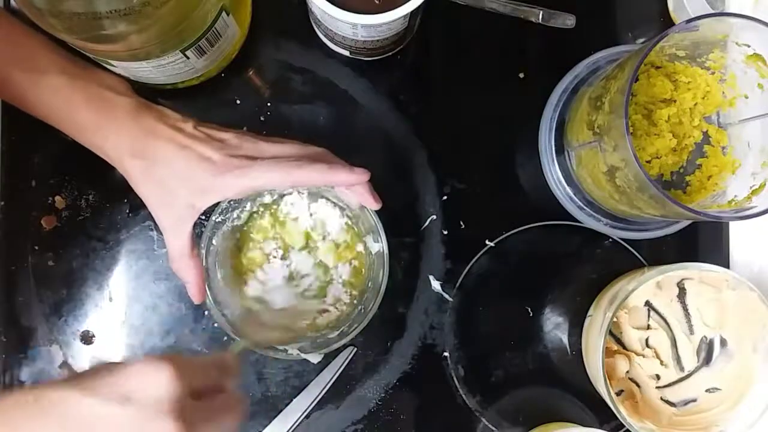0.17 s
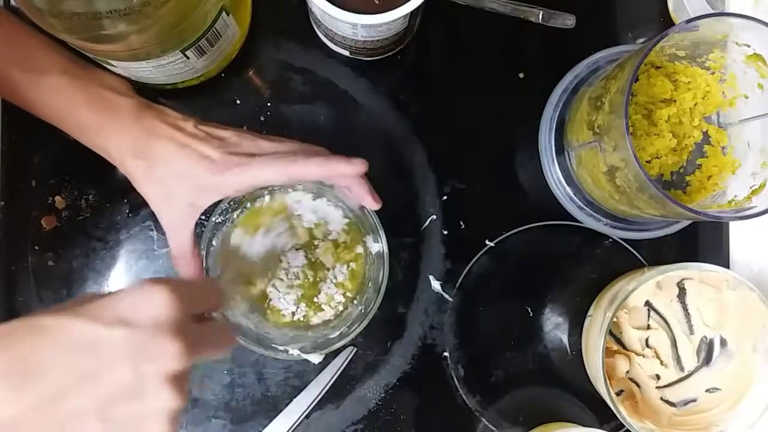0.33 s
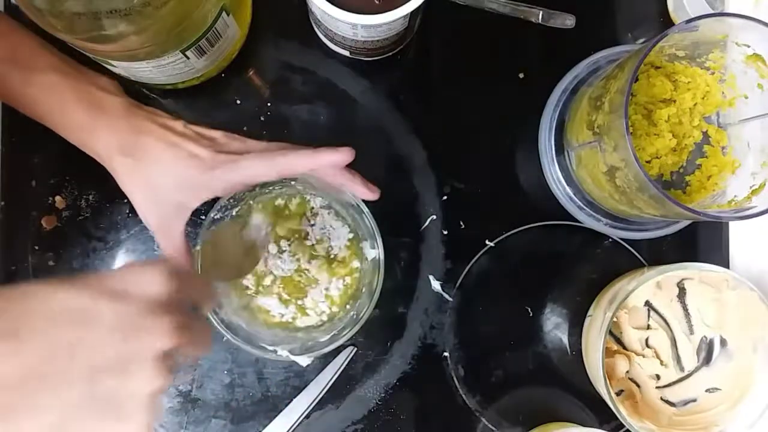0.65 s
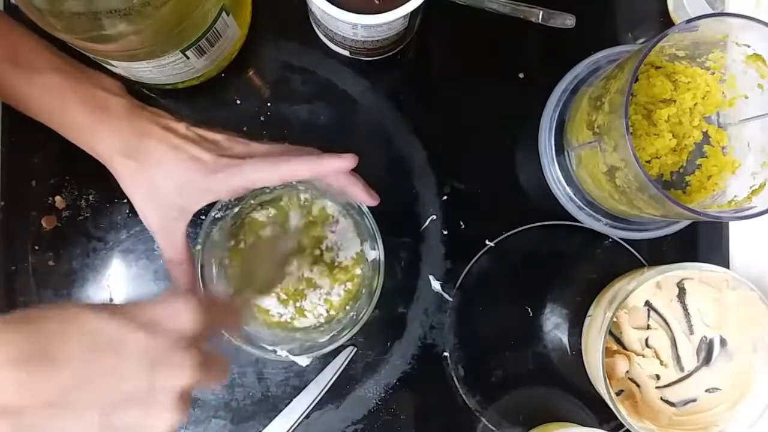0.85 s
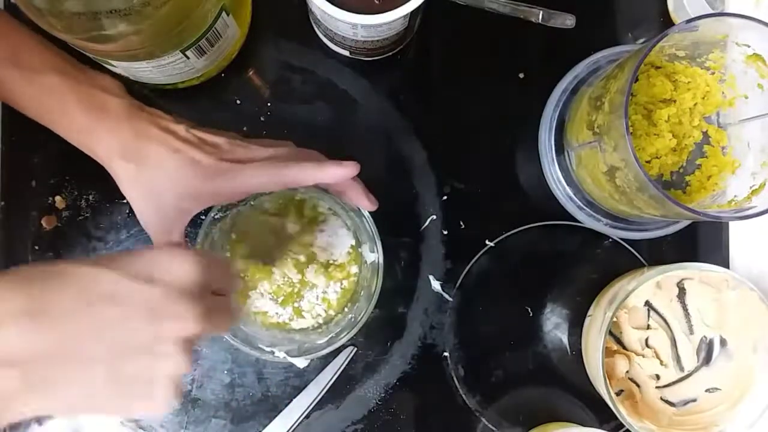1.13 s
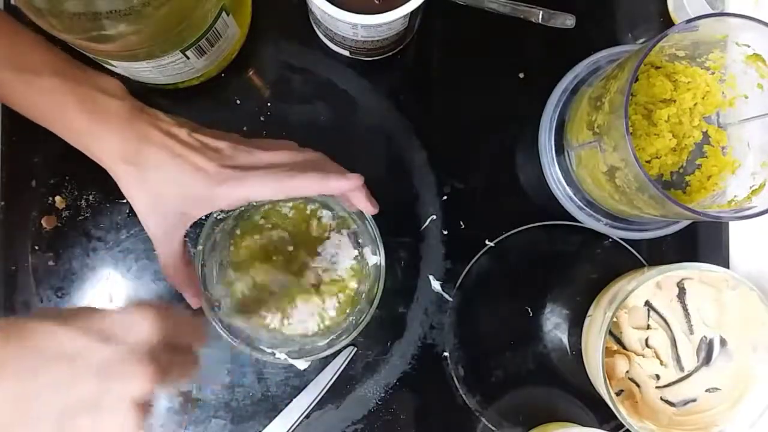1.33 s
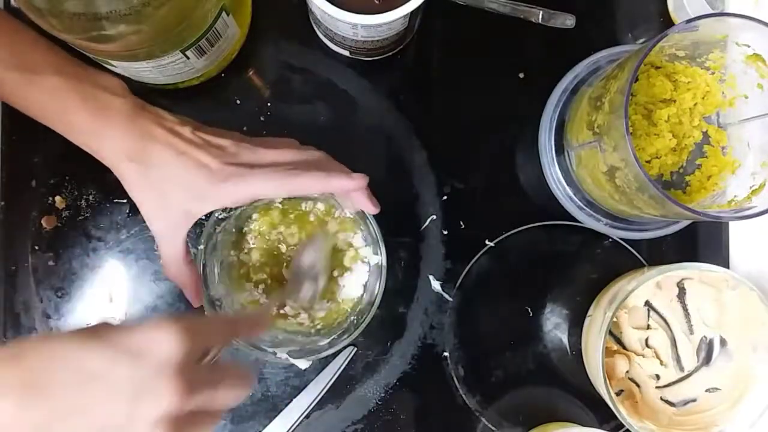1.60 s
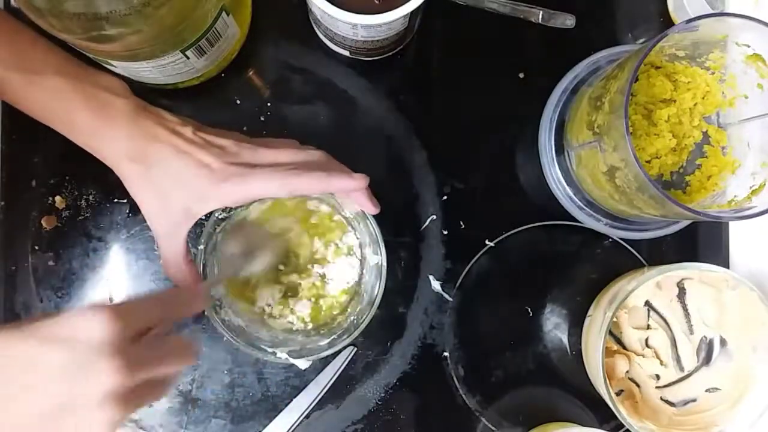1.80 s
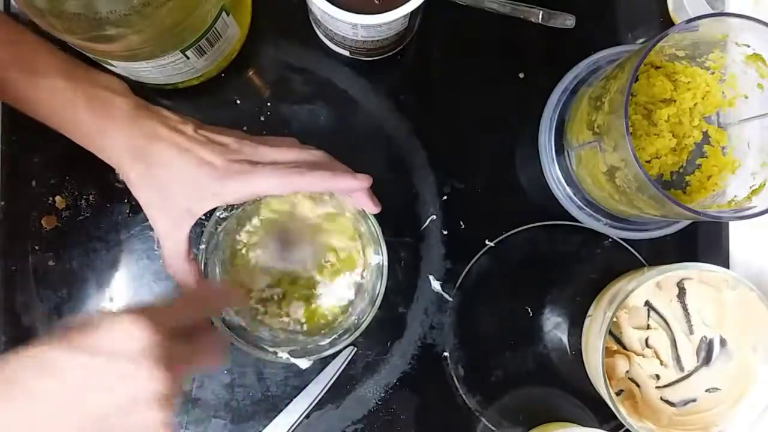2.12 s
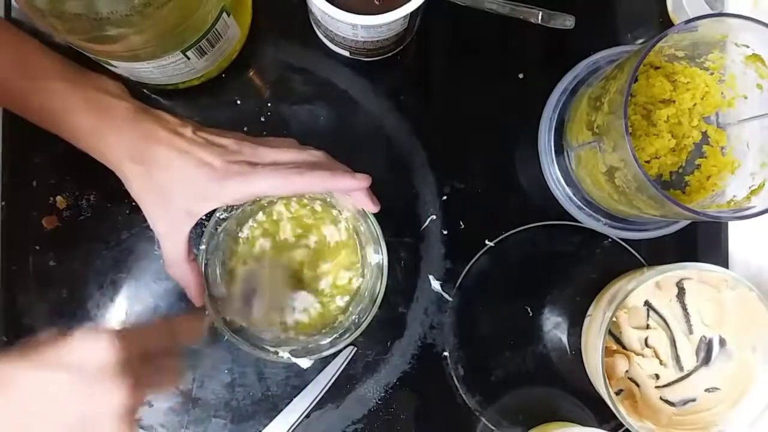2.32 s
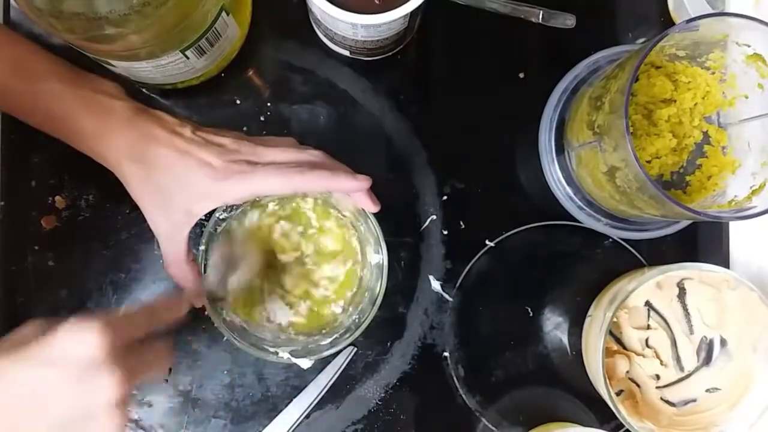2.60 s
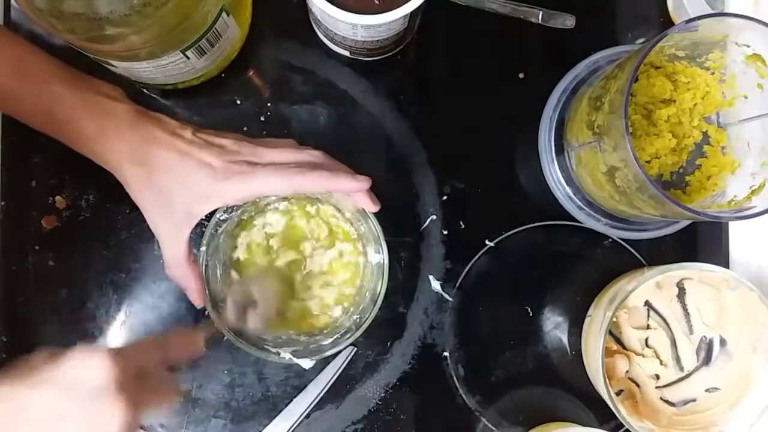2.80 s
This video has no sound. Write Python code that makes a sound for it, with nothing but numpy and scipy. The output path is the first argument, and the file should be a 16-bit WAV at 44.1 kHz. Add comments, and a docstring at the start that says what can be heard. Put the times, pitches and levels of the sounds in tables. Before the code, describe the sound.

Spoon stirring sticky paste in a glass bowl, with irregular clinks, dull knocks and soft scrapes.

```python
"""On a kitchen counter, a metal spoon stirs thick sugary paste in a small glass bowl held by one hand.
Impact on bare glass excites the bowl's modes in a clink, and the bowl thumps the counter; cushioned by
paste, the spoon only knocks dully. The sugar grinds softly, crackles as it tears off the spoon and
scrapes along the wall. A small room reverberates and an appliance hums; the sound is close and mono."""
import sys
import numpy as np
from scipy import signal
from scipy.fft import rfft, irfft, next_fast_len
from scipy.io import wavfile
from scipy.ndimage import uniform_filter1d, map_coordinates

SR = 44100
rng = np.random.default_rng(int(sys.argv[2]) if len(sys.argv) > 2 else 0)


def master(y):
    """Save y as 16-bit WAV."""
    cut = np.clip(np.atleast_2d(y).T, -1, 1)
    pcm = np.round(cut * 32767)  # scale
    wavfile.write(sys.argv[1], SR, pcm.astype(np.int16))


N = 130095

# friction spectrum of wet sugar (frequency [Hz], relative level [dB])
SUGAR_SPECTRUM = [(300, -13.5), (900, -0.5), (1700, 3), (2600, -6.5), (4500, -6.5), (7000, -14),
                  (9000, -12.5), (11000, -22), (15000, -20.5)]


def amp(db):
    """Decibels to amplitude ratio."""
    return 10 ** (np.asarray(db) / 20)


def along(points, hz):
    """Interpolation of (frequency, value) points on a logarithmic frequency axis."""
    f, v = np.transpose(points)
    return np.interp(np.log(hz + 1), np.log(f + 1), v)


def resonance(hz, centre_hz, half_width_oct):
    """A Lorentzian peak of height 1 in log frequency."""
    return 1 / (1 + (np.log2((hz + 1) / centre_hz) / half_width_oct) ** 2)


def wobble(rate):
    """Slow random modulation: a spline through `rate` knots a second."""
    knots = rng.standard_normal(int(N * rate / SR) + 4)
    return map_coordinates(knots, [np.arange(N) * rate / SR])


def coloured(x, spectrum):
    """Spectral shaping of x by a dB function of frequency, scaled to rms 1."""
    size = next_fast_len(len(x))
    gain = amp(spectrum(np.fft.rfftfreq(size, 1 / SR)))
    shaped = irfft(rfft(x, size) * gain, size)[:len(x)]
    return shaped / np.sqrt(np.mean(shaped ** 2) + 1e-20)


def burst(t, spectrum, t60_s, rise_s=1e-4):
    """Modal overlap: dense, heavily damped vibrations merge into exponentially decaying noise."""
    envelope = amp(-60 * t / t60_s) * (1 - np.exp(-t / rise_s))
    magnitude = amp(spectrum(np.fft.rfftfreq(len(t), 1 / SR)))
    x = coloured(rng.standard_normal(len(t)), spectrum) * envelope
    for _ in range(3):  # impose spectrum and envelope in turn to even out random peaks
        x = irfft(magnitude * np.exp(1j * np.angle(rfft(x))), len(t))
        x = envelope * x / np.sqrt(np.abs(uniform_filter1d(x * x, size=300)) + 1e-20)
    return x


def add(track, start_s, x):
    """Superposition of x on the track."""
    part = track[max(round(start_s * SR), 0):][:len(x)]
    part += x[:len(part)]


def kitchen(x, direct_db=0):
    """Reverberation: direct sound, early reflections from counter and jars, and a short diffuse tail."""
    # reverberation time of the room (frequency [Hz], T60 [s])
    decay_times = [(100, 0.78), (400, 0.59), (1500, 0.3), (4000, 0.35), (8000, 0.28)]
    tail_db, tail_rise_s, early_db, echoes = -10, 0.0069, -7.5, 12
    hz, t, noise = signal.stft(rng.standard_normal(SR // 2), SR, nperseg=256)
    tail = signal.istft(noise * amp(-60 * t / along(decay_times, hz)[:, None]), SR, nperseg=256)[1]
    tail *= 1 - np.exp(-np.arange(len(tail)) / SR / tail_rise_s)
    response = amp(tail_db) * tail / np.linalg.norm(tail)
    delays_s = .003 + .016 * rng.random(echoes)
    response[(delays_s * SR).astype(int)] += amp(early_db) * rng.choice([-1, 1], echoes) / np.sqrt(echoes)
    response[0] += amp(direct_db)
    return signal.fftconvolve(x, response)[:len(x)]


def appliance():
    """Tones over broadband noise: a hum, slightly modulated in level and phase, in steady room air."""
    # partials of the hum (frequency [Hz], level [dB])
    partials = [(119, -67), (199, -55), (392, -65), (473, -62.5)]
    # spectrum of the room air (frequency [Hz], relative level [dB])
    air_spectrum = [(25, -30.5), (58, -16), (160, -10.5), (300, -13), (430, -18.5), (600, -18), (1100, -32),
                    (1550, -36), (2100, -55), (4000, -52.5), (5400, -47), (9200, -44.5), (10200, -57),
                    (16000, -60)]
    waver_db, air_db = 2.5, -54
    t = np.arange(N) / SR
    hum = sum(amp(db + waver_db * wobble(9.7)) * np.sin(2 * np.pi * hz * t + 0.48 * wobble(7.1))
              for hz, db in partials)
    return hum + amp(air_db) * coloured(rng.standard_normal(N), lambda hz: along(air_spectrum, hz))


def grinding():
    """Shot noise: wet sugar grains crushed under the moving spoon each give a random impulse."""
    # envelope of the stirring (time [s], relative level [dB])
    stirring = [(0, -49), (0.182, -66.5), (0.503, -77.5), (0.852, -78.5), (1.151, -76), (1.451, -70.5),
                (1.62, -70), (1.781, -63.5), (2.05, -66.5), (2.2, -63), (2.401, -55.5), (2.8, -54.5),
                (2.95, -59.5)]
    grains_per_s, spread_db, gain_db, waver_db = 1800, 5, -3.5, 2.2
    impulses = (rng.random(N) < grains_per_s / SR) * rng.choice([-1, 1], N)
    grains = impulses * amp(spread_db * rng.standard_normal(N))
    level_db = np.interp(np.arange(N) / SR, *np.transpose(stirring)) + gain_db + waver_db * wobble(5.7)
    return kitchen(coloured(grains, lambda hz: along(SUGAR_SPECTRUM, hz)) * amp(level_db))


def knocks():
    """Cushioned impact: paste softens the blow to a snap, a broad resonance and a short pitched core."""
    # blows through paste (time [s], level [dB], pitch [Hz], resonance height [dB],
    # treble cutoff [Hz], rise time [s], thump level [dB])
    blows = [(.0095, -36, 1460, 0, 6670, 0.00034, -33.5), (.260, -25, 1290, 0.5, 5000, 0.00048, -27.5),
             (0.685, -38, 776, 2, 7000, 0.004, -37), (0.9603, -26, 1350, 5.5, 6000, 0.00023, -22.5),
             (1.070, -28, 790, 13.5, 6130, 0.0035, -36), (1.138, -27, 1386, 8, 8100, 0.00036, -33),
             (1.2598, -31.5, 1445, 11, 11360, 0.0002, -41), (1.818, -35, 1766, 12, 4860, 0.0025, -46.5),
             (1.837, -37, 1700, 16, 4510, 0.00046, -48.5), (1.916, -44.5, 1033, 13, 2100, 0.00073, -44),
             (2.1296, -22, 1610, 4.5, 5180, 0.00031, -31), (2.133, -23.5, 2305, 16.5, 2480, 0.00025, -35),
             (2.204, -35.5, 1510, 6.5, 2630, .0025, -40), (2.252, -45, 1870, 18, 4080, 0.00066, -47),
             (2.4446, -20, 2018, 14.5, 3780, 0.00041, -38), (2.460, -31.5, 2010, 15, 3850, 0.00016, -33)]
    # spectrum of a knock before cutoff and resonance (frequency [Hz], relative level [dB])
    knock_spectrum = [(200, -16.5), (600, -16), (850, 2.5), (1200, 5), (2300, -2.5), (2800, -3), (3900, -3),
                      (5000, -9), (7000, -9), (15000, -13.5)]
    snap_db, core_db, core_t60_s, half_width_oct = -7, -19, .04, .22
    out, t = np.zeros(N), np.arange(SR // 2) / SR
    dulled = lambda f, hz: along(knock_spectrum, f) - 10 * np.log10(1 + (f / hz) ** 4)
    for start_s, db, hz, peak_db, cutoff_hz, rise_s, thump_db in blows:
        snap = amp(snap_db) * burst(t, lambda f: dulled(f, 2 * cutoff_hz), t60_s=0.0079, rise_s=rise_s)
        core_envelope = amp(core_db + peak_db - 60 * t / core_t60_s) * (1 - np.exp(-t / rise_s))
        core = core_envelope * np.sin(2 * np.pi * hz * t)
        peaks = lambda f: resonance(f, hz, half_width_oct) + .55 * resonance(f, 2 * hz, half_width_oct)
        body = burst(t, lambda f: dulled(f, cutoff_hz) + peak_db * peaks(f), t60_s=0.031, rise_s=rise_s)
        knock = amp(db) * (snap + core + body) + amp(thump_db) * thump(t)
        add(out, start_s, kitchen(knock, direct_db=-0.5))
    return out


def thump(t, tilt_db_per_oct=0, boom_db=0):
    """Structure-borne sound: the bowl's foot jolts the counter, which booms in the bass."""
    # spectrum of the jolt (frequency [Hz], relative level [dB])
    jolt_spectrum = [(25, -34.5), (50, -29), (80, -10.5), (140, 3), (230, -7), (340, 7), (470, -3),
                     (800, 0), (1050, -13), (1300, -4.5), (1600, -9.5), (3000, -39.5)]
    knee_hz, boom_hz = 200, 110
    tilt = lambda f: tilt_db_per_oct * np.log2(np.maximum(f, knee_hz))
    boom = lambda f: boom_db / (1 + (f / boom_hz) ** 4)
    return burst(t, lambda f: along(jolt_spectrum, f) + tilt(f) + boom(f), t60_s=0.057, rise_s=0.0013)


def clinks():
    """Modal excitation: metal on bare glass clacks, thumps and rings; the spot struck weights the modes."""
    # strikes on glass (time [s], five ring levels at ring_hz [dB], clack level [dB],
    # clack tilt [dB/octave], thump level [dB], thump tilt [dB/octave], counter boom [dB])
    strikes = [(.2178, -35.5, -24, -13, -12.5, -9, -11.5, 2.5, -18.5, 2, 1),
               (.567, -29.5, -36, -30, -41, -42, -30, -3.5, -20.5, 0.88, -7.5),
               (0.615, -57, -40, -60, -70, -42, -44, -4, -42, -1.1, -6),
               (.9453, -17, -19.5, -13.5, -18, -18, -15.5, 0.5, -19, 1.5, -8.5),
               (2.65, -15, -12, -13, -22.5, -11.5, -15, 0.7, -32.5, -1.9, 24)]
    # points across the ring's spectrum (frequency [Hz])
    ring_hz = [1400, 3000, 5350, 6100, 8100]
    # hand-damped bowl modes, mostly in close pairs (frequency [Hz], relative level [dB], T60 [s])
    modes = [(1240, -10, .06), (1385, 0, .07), (1915, -12, .07), (2480, -12, .06), (3000, -3.5, .11),
             (3180, -7, .08), (3500, -10, .07), (4420, -11, .06), (5210, -5, .05), (5350, -1, .052),
             (5900, -9, .06), (6150, -7, .06), (7970, -7, .05), (8120, -2, .062)]
    # spectrum of the hard contact (frequency [Hz], relative level [dB])
    clack_spectrum = [(200, -18.5), (700, -13.5), (1900, 2.5), (2600, 4), (3400, 4.5), (4500, 3.5),
                      (4900, -1.5), (6000, 7.5), (6900, -8.5), (8000, -8.5), (9500, -7), (10800, -16),
                      (15000, -15.5)]
    scatter_db = 1.2
    out, t = np.zeros(N), np.arange(SR // 2) / SR
    hz, mode_db, t60_s = np.transpose(modes)[:, :, None]
    line_width_hz = 36 * (hz / 3000) ** .6  # the spoon chatters on the wall and blurs each mode
    phase_step = np.sqrt(2 * np.pi * line_width_hz / SR)
    for start_s, *ring_db, clack_db, clack_tilt, thump_db, thump_tilt, boom_db in strikes:
        levels_db = mode_db + np.interp(hz, ring_hz, ring_db) + scatter_db * rng.standard_normal(hz.shape)
        phase = 2 * np.pi * (hz * t + rng.random(hz.shape))
        phase += phase_step * rng.standard_normal(phase.shape).cumsum(1)
        ring = (amp(levels_db - 60 * t / t60_s) * np.sin(phase)).sum(0)
        clack = burst(t, lambda f: along(clack_spectrum, f) + clack_tilt * np.log2(f + 1), t60_s=0.045)
        clink = ring + amp(clack_db) * clack + amp(thump_db) * thump(t, thump_tilt, boom_db)
        add(out, start_s, kitchen(clink))
    return out


def crackles():
    """Adhesive failure: sticky sugar lets go of the spoon in short showers of tiny clicks."""
    # sugar tearing away (time [s], level [dB])
    tears = [(.347, -47), (.376, -43.5), (0.66, -50.5), (.686, -45), (.724, -45), (1.016, -50),
             (1.031, -42), (1.106, -45)]
    # spectrum of the clicks (frequency [Hz], relative level [dB])
    click_spectrum = [(800, -16), (3000, 5.5), (6500, -2), (8300, 1), (10500, -10.5), (15000, -9.5)]
    clicks_per_s, t60_s, rise_s = 4000, .06, .003
    out, t = np.zeros(N), np.arange(SR // 8) / SR
    for start_s, db in tears:
        clicks = (rng.random(len(t)) < clicks_per_s / SR) * rng.standard_normal(len(t))
        envelope = amp(db - 60 * t / t60_s) * (1 - np.exp(-t / rise_s))
        add(out, start_s, envelope * coloured(clicks, lambda hz: along(click_spectrum, hz)))
    return kitchen(out)


def scrapes():
    """Sliding friction: the coated spoon drags on the wall, and noise swells and fades in one resonance."""
    # short wet drags (peak time [s], 1/e half-length [s], level [dB], pitch [Hz])
    drags = [(2.017, 0.013, -60, 4400), (2.318, 0.058, -61.5, 4300), (2.424, 0.0046, -34.5, 1840),
             (2.556, 0.0046, -47, 1620), (2.612, 0.0089, -48.5, 1490), (2.88, 0.011, -55, 1720),
             (2.939, 0.017, -51, 1810)]
    skirt_db, half_width_oct = -11, 0.26
    out, t = np.zeros(N), np.arange(SR // 4) / SR
    middle_s = t.mean()
    for peak_s, half_length_s, db, hz in drags:
        spectrum = lambda f: along(SUGAR_SPECTRUM, f) + skirt_db * (1 - resonance(f, hz, half_width_oct))
        envelope = amp(db) * np.exp(-((t - middle_s) / half_length_s) ** 2)
        add(out, peak_s - middle_s, envelope * coloured(rng.standard_normal(len(t)), spectrum))
    return kitchen(out)


def scene():
    """Superposition: all sources add and reach both channels alike."""
    return np.tile(clinks() + knocks() + crackles() + grinding() + scrapes() + appliance(), (2, 1))


def record(dry):
    """Band limiting and soft saturation: deep bass and top treble are cut, the highest peaks rounded."""
    low_cut_hz, ceiling, top_hz, edge_hz = 49, .9, 16800, 1000
    lean = signal.sosfilt(signal.butter(3, low_cut_hz, "high", fs=SR, output="sos"), dry)
    rounded = lean / (1 + np.abs(lean / ceiling) ** 6) ** (1 / 6)
    size = next_fast_len(N + SR // 2)
    passband = np.clip((top_hz - np.fft.rfftfreq(size, 1 / SR)) / edge_hz, 0, 1) ** 2
    return irfft(rfft(rounded, size) * passband, size)[:, :N]


dry = scene()
out = record(dry)
master(out)
```